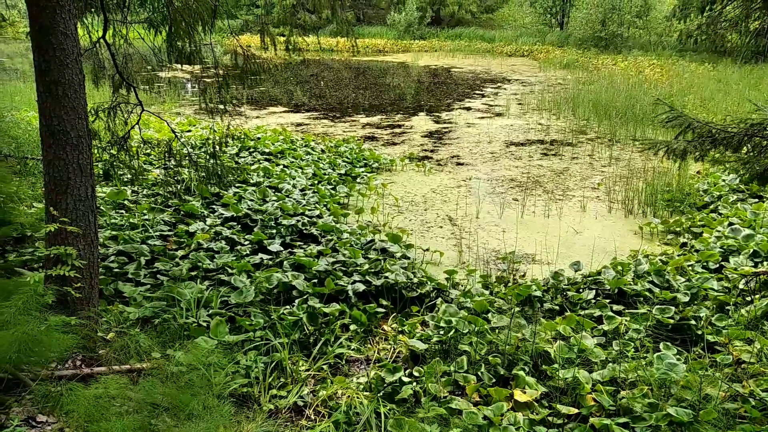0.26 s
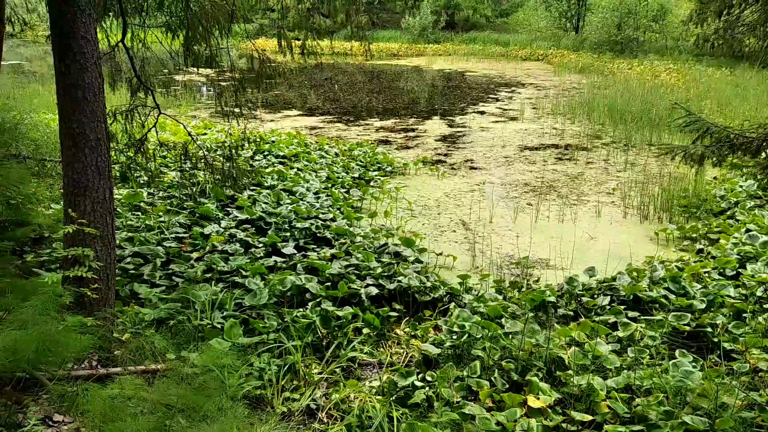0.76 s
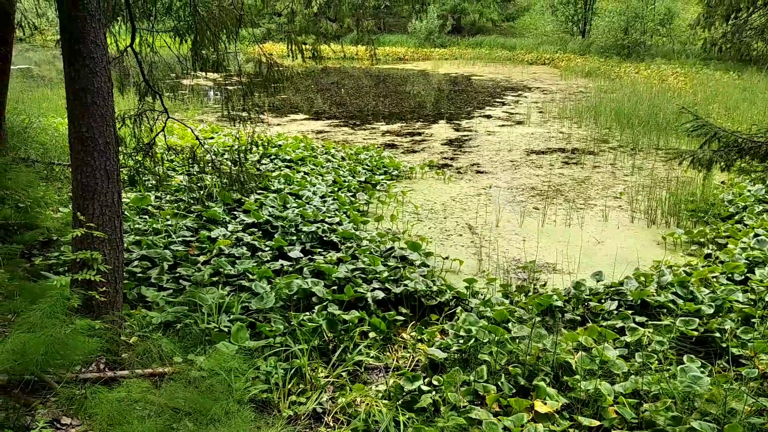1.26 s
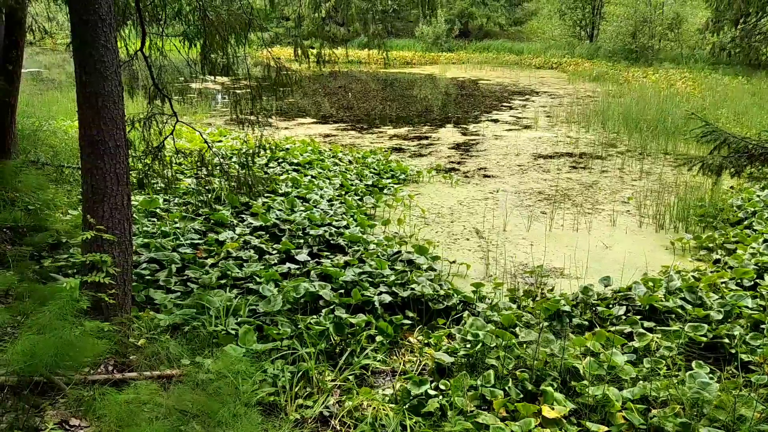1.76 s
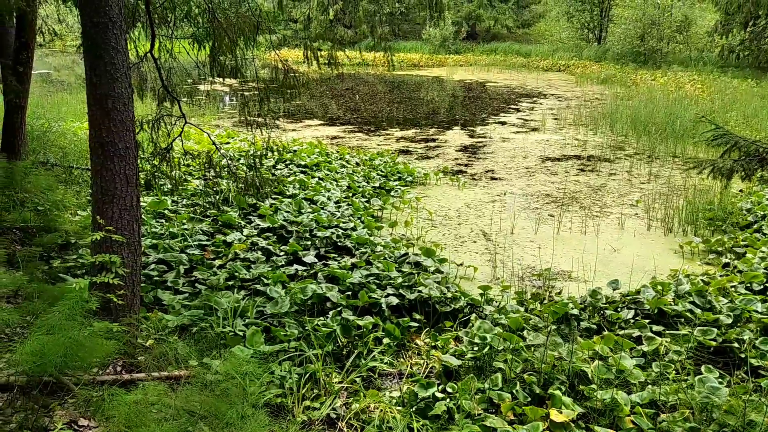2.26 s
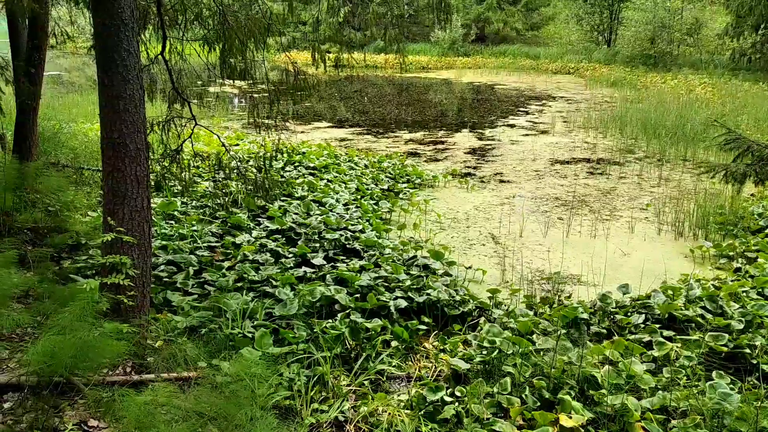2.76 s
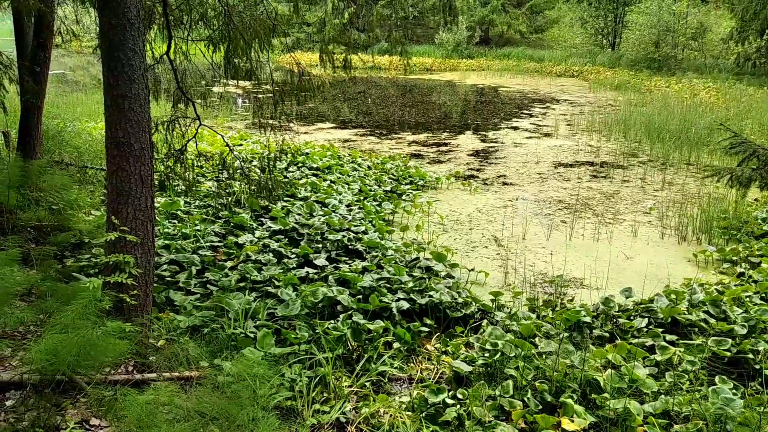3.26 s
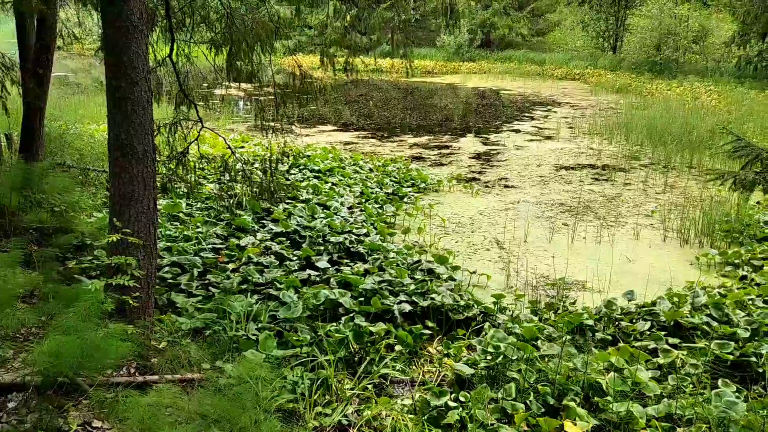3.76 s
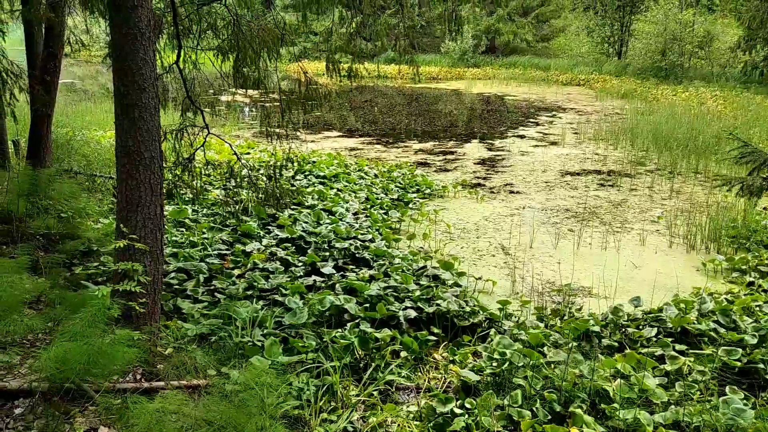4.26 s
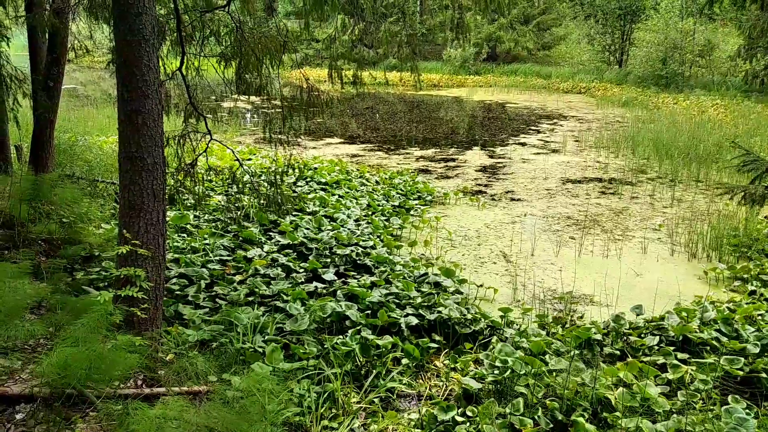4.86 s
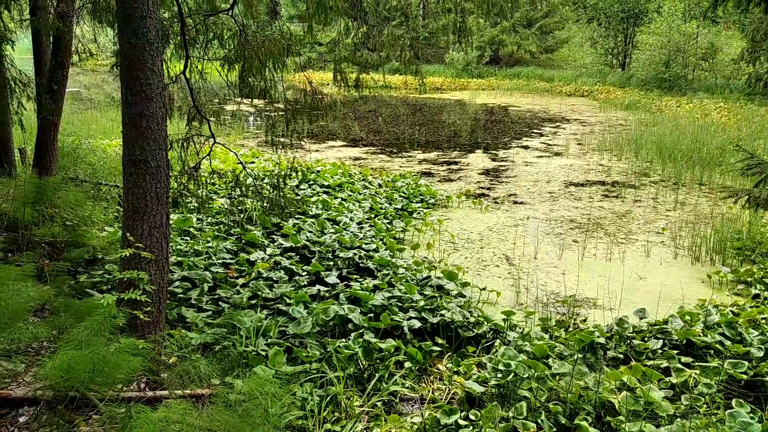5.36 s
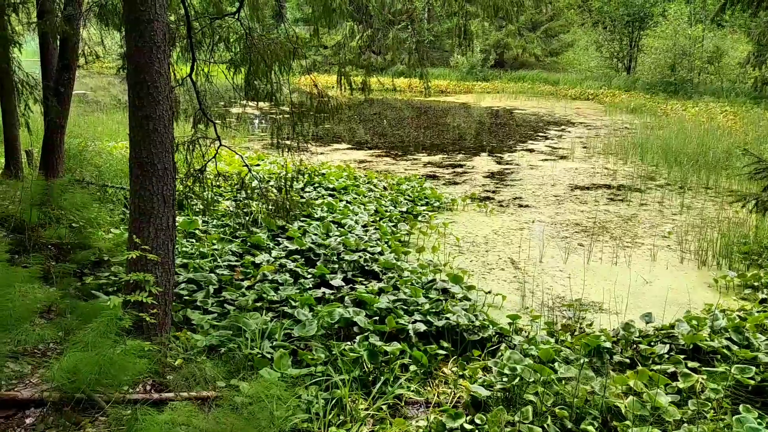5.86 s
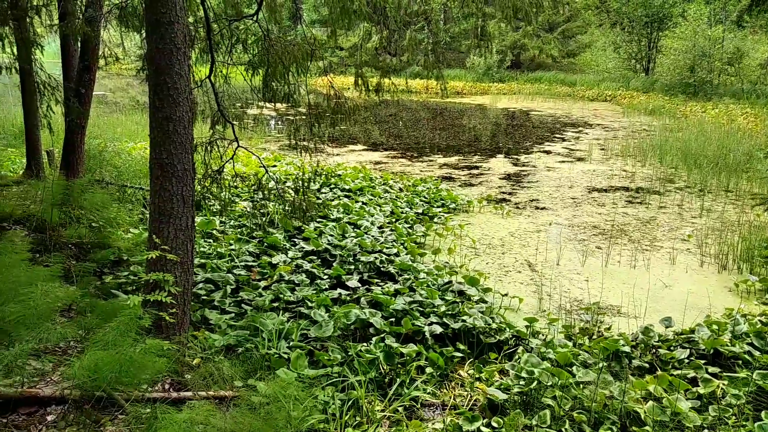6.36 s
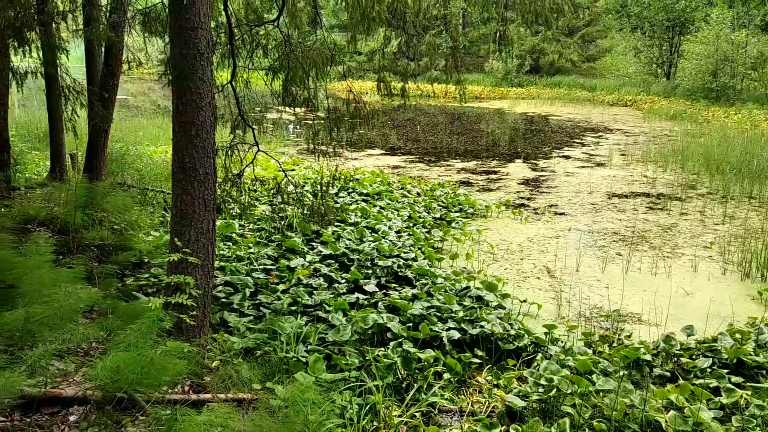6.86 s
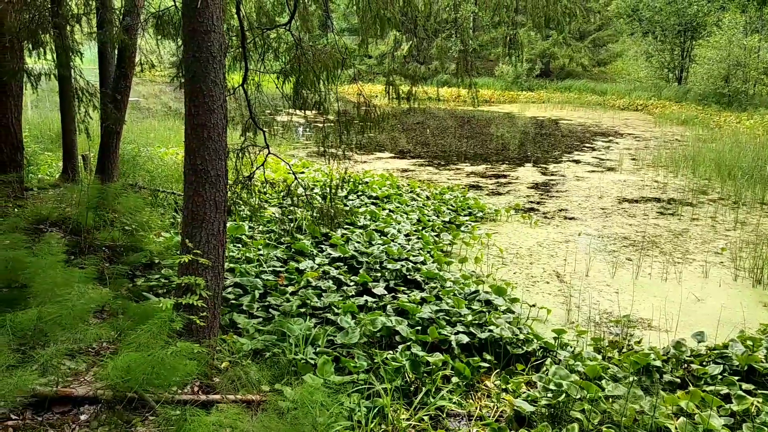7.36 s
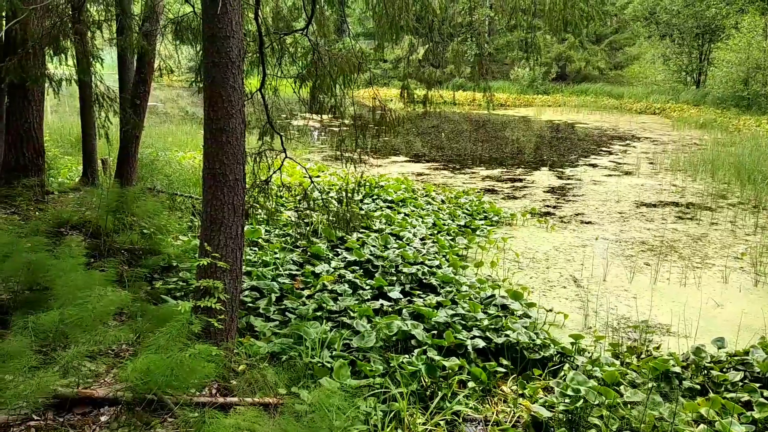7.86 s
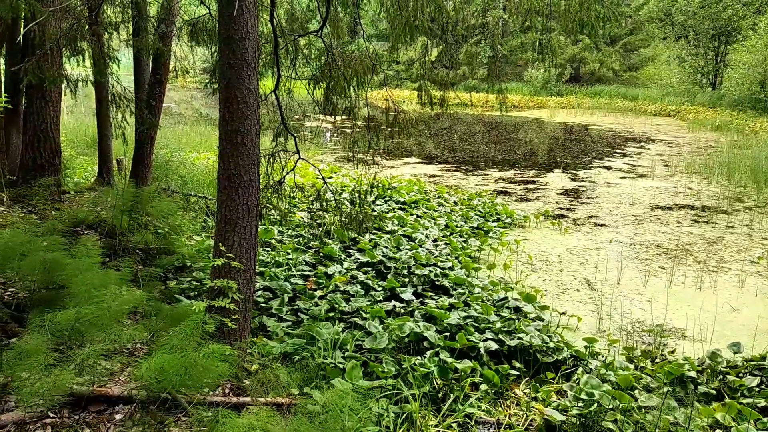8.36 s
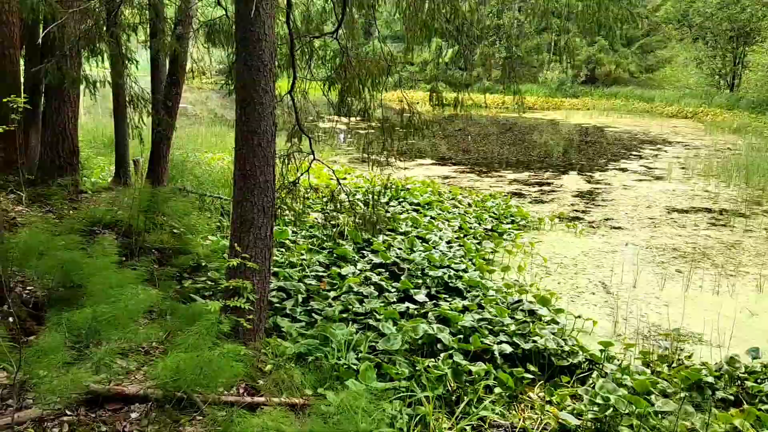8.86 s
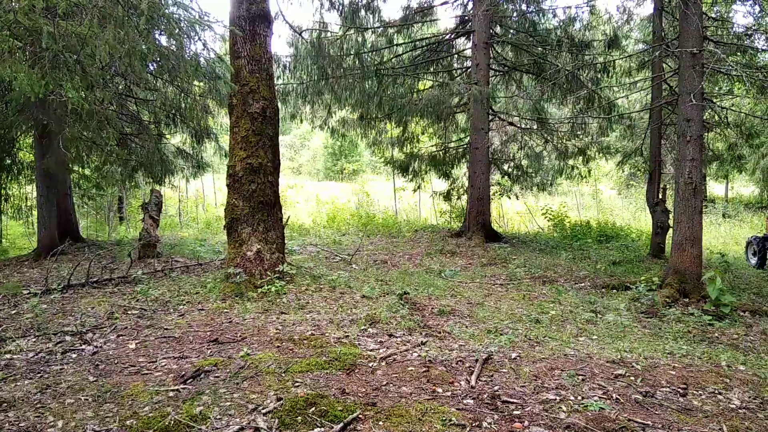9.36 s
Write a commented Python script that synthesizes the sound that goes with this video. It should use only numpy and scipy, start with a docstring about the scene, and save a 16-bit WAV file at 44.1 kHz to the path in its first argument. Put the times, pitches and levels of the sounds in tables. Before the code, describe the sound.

From 0 s a bush cricket's shrill, rapid buzz, about fifty strokes a second and brightest near 8 kHz, swells and stops at 2.7 s; a second, rougher singer carries on to 3.3 s. A hissing far chorus and very faint leaf noise sit behind. A light tap on the right comes at 0.15 s. Low wind gusts flutter and thump mainly on the left, hardest at 0.4-1.8 and 2.9-3.4 s. The strongest song grows from 3.6 s and ends at 6.6 s, overlapped by weaker ones until 7.4 and 8.4 s. The chorus thins around 6.5 s; four tiny notes near 2.1 kHz sound at 7.0-7.25 s. Another buzz swells from 7.5 s, wind now lighter. A faint tap at 9.0 s precedes near silence at 9.08-9.15 s; insects fade back in, with a slow deep bump at 9.4 s, continuing until the end at 9.6 s.

```python
"""Bush crickets sing beside a woodland pond, each song a fast buzz that swells and then stops.
Each singer rubs its wings about fifty times a second: clicks over a scrape, coloured by the wing, echoed by trees.
A far chorus and leaf hiss, made of patchy filtered noise, lie behind, with soft noise puffs and a short faint call
of four notes near 2.1 kHz at 7 s; gusts buffet the two microphone ports. Fingers tap the housing twice.
Near the end the sound drops out briefly, fades back in and gets a slow bump."""
import sys
import numpy as np
from scipy import signal
from scipy.fft import rfft, irfft, next_fast_len
from scipy.io import wavfile
from scipy.ndimage import uniform_filter1d, map_coordinates

SR = 44100
rng = np.random.default_rng(int(sys.argv[2]) if len(sys.argv) > 2 else 0)


def materialize(psi):
    """Save the field psi as 16-bit PCM at rate SR to the path in sys.argv[1].

    A 1-D psi becomes a single channel; in a 2-D psi each row is a channel.
    """
    bounded = np.clip(np.atleast_2d(psi).T, -1, 1)
    quanta = np.round(bounded * 32767).astype(np.int16)
    wavfile.write(sys.argv[1], SR, quanta)


N = 424241
TIME = np.arange(N) / SR  # seconds
# All source levels are set ahead of the fader in record().


def amp(db):
    """Decibels to linear gain."""
    return 10 ** (np.asarray(db) / 20)


def unit(x):
    """Scale to an RMS of one over all channels."""
    return x / np.sqrt(np.mean(x ** 2) + 1e-20)


def along(points, hz):
    """Read each column of (frequency [Hz], value, ..) points on a log frequency axis."""
    f, *cols = np.transpose(points)
    return np.array([np.interp(np.log(hz + 1), np.log(f + 1), c) for c in cols])


def curves(rows):
    """One value per sample for each column after the time."""
    s, *cols = np.transpose(rows)
    return [np.interp(TIME, s, c) for c in cols]


def wobble(rate):
    """A smooth random curve, rate knots a second."""
    knots = rng.standard_normal(int(N * rate / SR) + 4)
    return map_coordinates(knots, [TIME * rate])


def filtered(x, response):
    """Shape the spectrum of x by a (possibly complex) response of frequency."""
    m = next_fast_len(x.shape[-1] + 8192)
    spectrum = rfft(x, m) * response(np.fft.rfftfreq(m, 1 / SR))
    return irfft(spectrum, m)[..., :x.shape[-1]]


def patchy(depth_db):
    """Stereo noise whose gain varies in patches a few hundred hertz wide and some tens of milliseconds long."""
    z = signal.stft(rng.standard_normal((2, N)), nperseg=512)[2]
    field = uniform_filter1d(rng.standard_normal(z.shape), size=4, axis=1)  # across frequency
    field = uniform_filter1d(field, size=8, axis=2)  # across time
    return signal.istft(z * amp(depth_db * unit(field)), nperseg=512)[1][:, :N]


def leaves():
    """Faint broad leaf hiss, partly alike at both ports in the low middle."""
    # hiss colour: (frequency [Hz], relative level [dB per Hz])
    hiss_colour = [(40, -22), (150, 0), (400, -3.5), (900, -6), (1400, -8), (2050, -6.5), (3200, -13),
                   (5500, -12.5), (9000, -20), (14400, -17.5)]
    # left-right likeness of the hiss: (frequency [Hz], correlation [-1 to 1])
    likeness = [(100, -0.21), (300, 0.55), (650, 0.25), (1400, -0.15), (8000, -0.11)]
    # hiss loudness: (time [s], level [dB])
    hiss_level = [(0, -72.5), (1, -72.5), (4, -73), (9.1, -73.5), (9.14, -67.5), (9.62, -67)]

    def mid_side(hz):
        turn = np.arccos(np.clip(along(likeness, hz)[0], -1, 1)) / 2
        return amp(along(hiss_colour, hz)) * [np.cos(turn), np.sin(turn)]

    mid, side = filtered(patchy(depth_db=2), mid_side)
    sway_db = 0.5 * wobble(8.6)
    return amp(curves(hiss_level)[0] + sway_db) * unit(np.array([mid + side, mid - side]))


def puffs_and_call():
    """Soft puffs, and a short faint call of four notes near 2.1 kHz at 7 s, all of band-limited noise."""
    # puffs and notes: (time [s], left level [dB], centre [Hz], length [s], width [log-frequency],
    #  right over left [dB])
    puffs = [(3.94, -66, 219, 0.037, 0.53, -16), (4.033, -60.5, 177, 0.022, 0.47, -17),
             (4.399, -65.5, 193, 0.072, 0.36, -14), (0.13, -82, 2300, .006, .3, 6),
             (0.297, -79, 1790, 0.022, 0.56, -4), (7.038, -76, 2150, 0.011, .18, 2.5),
             (7.092, -75, 2090, 0.005, .15, 5.5), (7.165, -82, 2100, .025, 0.22, 7),
             (7.24, -83, 2000, .02, 0.18, 5)]
    out = np.zeros((2, N))
    t = np.arange(-SR // 8, SR // 8) / SR
    for s, db, centre, length, width, right_db in puffs:
        noise = rng.standard_normal((2, len(t)))
        puff = unit(filtered(noise, lambda hz: np.exp(-(np.log((hz + 1) / centre) / width) ** 2)))
        envelope = np.exp(-.5 * (t / length) ** 2)
        out[:, round(s * SR + t[0] * SR):][:, :len(t)] += amp([[db], [db + right_db]]) * puff * envelope
    return out


def chorus_band(levels, spectrum, throb_db, patchy_db):
    """Many far singers blur into a band of hiss that still throbs a little."""
    band = filtered(patchy(patchy_db), lambda hz: amp(along(spectrum, hz)))
    port_throb = throb_db * np.array([wobble(100), wobble(100)])
    shared_throb = 0.35 * wobble(16)
    return amp(curves(levels)[0]) * amp(port_throb + shared_throb) * band / np.std(band[0])


def far_chorus():
    """The main far band, a thin high hiss above it and a weak low edge of the chorus, 5.7 to 7.2 kHz."""
    # loudness of each band: (time [s], level [dB])
    main_level = [(0, -51.5), (1.5, -54.5), (3, -54.5), (3.3, -53.5), (3.6, -52.5), (4, -50), (5, -53),
                  (6.5, -71), (7.5, -63), (8.5, -52.5), (9.08, -54), (9.15, -44), (9.62, -48.5)]
    high_level = [(0, -66), (1.5, -68.5), (2.6, -67.5), (2.7, -79), (3.5, -80), (3.6, -68), (4, -67.5),
                  (4.5, -75), (6.5, -72.5), (6.7, -82.5), (7.6, -75.5), (8.3, -73), (9.62, -67.5)]
    low_edge_level = [(0, -73.5), (1.5, -70.5), (2.7, -73), (3.3, -74), (3.9, -72), (4.5, -73),
                      (5.5, -73.5), (6.3, -71), (6.7, -79.5), (8, -75), (8.4, -74), (9.1, -71), (9.62, -65)]
    # colour of each band: (frequency [Hz], relative left level [dB per Hz], relative right level [dB per Hz])
    main_colour = [(5430, -81, -78), (6570, -37.5, -30.5), (7166, -16, -12.5), (7830, -0.5, -5),
                   (8910, -2.5, -18), (9850, -9.5, -14.5), (11340, -21.5, -24), (11760, -26, -35.5),
                   (13200, -40.5, -51)]
    high_colour = [(10000, -32, -45), (11600, 1, -3.5), (12300, -7, -11), (13000, -2, -10),
                   (14400, -4, -11)]
    low_edge_colour = [(5150, -42, -42), (5680, -12.5, -14), (6150, -5.5, -6), (6550, 0, -3),
                       (7170, 4, 0.5), (7660, -26, -27)]
    main = chorus_band(main_level, main_colour, throb_db=1.5, patchy_db=1.5)
    high = chorus_band(high_level, high_colour, throb_db=2.5, patchy_db=4.0)
    low_edge = chorus_band(low_edge_level, low_edge_colour, throb_db=1.6, patchy_db=4.0)
    return main + high + low_edge


def wind():
    """Eddies push on each port separately, in lumps; harder gusts reach higher; the hardest suck and spring back."""
    # gusts on one port: (start [s], length [s], level [dB], port [0 left, 1 right])
    gust_rows = [(0, 0.014, -49.5, 0), (0.253, 0.85, -52.5, 0), (1.236, 0.19, -50.5, 0),
                 (1.756, 0.02, -56.5, 0), (1.85, 0.089, -63, 0), (2.3, 0.19, -66.5, 0),
                 (2.707, 0.046, -54.5, 0), (2.854, 0.56, -51, 0), (3.58, 0.25, -54.5, 0),
                 (4.285, 0.26, -52.5, 0), (4.647, 0.25, -55, 0), (5.158, 0.46, -53, 0),
                 (5.753, 0.23, -62, 0), (6.103, 0.091, -61, 0), (6.42, .05, -63.5, 0),
                 (6.62, 0.082, -59.5, 0), (7.5, .15, -67.5, 0), (7.804, 0.2, -55.5, 0),
                 (8.0, 0.21, -60.5, 0), (8.35, 0.21, -62, 0), (8.6, .06, -65.5, 0), (8.996, 0.053, -62, 0),
                 (9.44, 0.08, -55.5, 0), (0.16, 0.33, -66.5, 1), (0.703, 0.14, -59.5, 1),
                 (1.215, 0.12, -57, 1), (1.72, .12, -63, 1), (1.92, 0.15, -65, 1), (2.66, .2, -64, 1),
                 (4.98, 0.1, -60.5, 1), (5.748, 0.28, -66.5, 1), (6.96, 0.14, -66, 1),
                 (7.353, 0.095, -59.5, 1), (9.42, 0.23, -66, 1)]
    # rumble colour: (frequency [Hz], relative level [dB per Hz])
    rumble_colour = [(8, -0.5), (25, 1.5), (45, -0.5), (80, -10), (120, -18), (180, -27), (300, -40.5),
                     (600, -96)]
    # hardest eddies, on the left port: (time [s], depth [dB], width [s])
    hard_eddies = [(0.429, -42.5, 0.0039), (0.472, -44, 0.0032), (0.585, -46, 0.0037),
                   (0.887, -48.5, 0.003), (1.284, -39, 0.0053), (1.438, -46.5, 0.0049),
                   (1.541, -46, 0.0043), (1.772, -44.5, 0.0052), (2.717, -49, 0.0042),
                   (2.905, -42.5, 0.004), (2.929, -40, 0.003), (2.94, -45, 0.0034), (3.007, -41, 0.0036),
                   (3.026, -41, 0.0032), (3.142, -50, 0.0019), (3.155, -40.5, 0.0037),
                   (3.26, -43.5, 0.0024), (3.354, -41, 0.0031), (4.378, -42.5, 0.0033),
                   (5.391, -42.5, 0.004)]
    rise_db_s, fall_db_s = 201, 134
    calm_db = np.where(TIME < 9.12, -70.5, -77)  # between gusts, before and after the dropout
    db = calm_db + np.zeros((2, 1))
    for s, length, gust_db, port in gust_rows:
        before = np.maximum(s - TIME, 0)
        after = np.maximum(TIME - s - length, 0)
        shape_db = gust_db - rise_db_s * before - fall_db_s * after
        db[round(port)] = np.maximum(db[round(port)], shape_db)

    rumble = unit(filtered(rng.standard_normal((2, N)), lambda hz: amp(along(rumble_colour, hz))))
    flutter = unit(filtered(rng.standard_normal((2, N)),
                            lambda hz: np.exp(-(np.log((hz + 1) / 80) / 0.45) ** 2)))
    lumps = amp(3.6 * np.array([wobble(17), wobble(17)]))
    flutter_db = 1.474 * db + 14  # faster flutter swings wider than the gust
    gusts = unit(lumps * rumble) * amp(db) + unit(lumps ** 2 * flutter) * amp(flutter_db)

    t = np.arange(-SR // 20, SR // 20) / SR
    snap_db, snap_share = -18.5, 0.48  # sharper core of an eddy: relative level, share of its width
    for s, depth_db, width in hard_eddies:
        u = t / width
        core = u / snap_share
        suck = (1 - u ** 2) * np.exp(-.5 * u ** 2)
        snap = amp(snap_db) * (1 - core ** 2) * np.exp(-.5 * core ** 2)
        gusts[0, round(s * SR) - SR // 20:][:len(t)] -= amp(depth_db) * (suck + snap)
    return gusts


def ticks():
    """Short finger taps ring the damped modes of the housing; a brighter tap tilts toward the upper modes."""
    # taps: (time [s], left level [dB], right level [dB], lift at the top mode [dB])
    taps = [(0.1463, -75, -47, 0), (9.0068, -80, -61, 9)]
    # housing modes: (frequency [Hz], relative level [dB], 60 dB decay [s])
    modes = [(300, -6, .024), (450, -1, .014), (900, -4, .008), (1400, -3, .007), (1900, -3, .007),
             (2300, -7, .006)]
    out, t = np.zeros((2, N)), np.arange(SR // 20) / SR
    low, top = modes[0][0], modes[-1][0]
    soft_onset = 1 - np.exp(-t / .0008)  # a fingertip is soft
    for s, left_db, right_db, bright_db in taps:
        ring = np.zeros(len(t))
        for hz, db, t60 in modes:
            tilt_db = bright_db * (hz - low) / (top - low)
            ring += amp(db + tilt_db - 60 * t / t60) * np.sin(2 * np.pi * hz * t)
        out[:, round(s * SR):round(s * SR) + len(t)] += amp([[left_db], [right_db]]) * ring * soft_onset
    return out


def bump():
    """A slow push on the body: pressure rises, leaks away and sets the housing shaking at 43 Hz."""
    # the push: (time [s], left level [dB], right level [dB])
    push_row = (9.412, -24, -26.3)
    s, *db = push_row
    t = np.maximum(TIME - s, 0)
    push = (1 - np.exp(-t / .03)) * np.exp(-t / .09)
    shake = 0.018 * np.sin(2 * np.pi * 43 * t) * (1 - np.exp(-t / 0.044))
    return amp(db)[:, None] * (push + shake)


def song(effort, rhythm, wing, t60=0.37):
    """Wing strokes click and scrape as a song swells, tires and stops; weak ones sound flat; trees scatter it."""
    # clicks within a stroke: (place [share of the cycle], relative level [dB])
    wing_teeth = [(-.27, -15), (-.13, -12), (-.02, -3.5), (.1, -5), (.22, -15)]
    begin, stop, full_db, below_db, swell, echo_db, lag, right_db, scrape_db = effort
    rate, sag, tire, tiring, phase = rhythm
    start = round(begin * SR)
    t = TIME[start:round((stop + .3) * SR)]  # leaves room for the echo

    # stroke count and loudness
    left = stop - t
    tired = np.maximum(tiring - left, 0)
    cycle = phase - rate * left - (sag * left ** 2 + tire * tired ** 2) / 2
    under_db = below_db * np.exp(-(np.abs(t - begin) / swell) ** 1.4)
    level = full_db - under_db - 0.5 * tire * tired  # 0.5 dB for each stroke a second lost to tiring
    waver, slip = (wobble(10)[start:start + len(t)] for _ in range(2))
    effort_gain = amp(level + .4 * waver) * (left > 0)

    # mix of full-pitch and flat strokes: weak ones, and now and then a slip, go flat
    strong = np.clip(1.5 - under_db / 5, 0, 1) * np.clip(1 - .025 * slip ** 2, 0, 1)
    flat_share = .024  # how far flat

    def normal_wing(hz):
        return along(wing, hz)

    def flat_wing(hz):
        return along(wing, hz * (1 + flat_share))

    # clicks, scattered in time [share of a stroke] and size [dB]
    share, size_db = np.transpose(wing_teeth)
    whole = np.arange(np.ceil(cycle[0]), np.floor(cycle[-1]))[:, None]
    chance = rng.standard_normal((len(whole), 2, len(share)))
    stroke_jitter = .018 * rng.standard_normal(whole.shape)
    places = whole + share + .016 * chance[:, 0] + stroke_jitter
    at = np.searchsorted(cycle, places).clip(0, len(t) - 1)
    sizes = amp(size_db + .4 * chance[:, 1])
    clicks = np.bincount(at.ravel(), sizes.ravel(), len(t))

    def click_ring(hz):
        # a click already carries 0.8 of the wing colour in dB, so it rings mostly the main resonance
        return amp(.8 * np.array([normal_wing(hz)[0], flat_wing(hz)[0]]))

    clicks = filtered(unit(clicks) * np.sqrt([strong, 1 - strong]), click_ring).sum(axis=0)

    # the scrape swells once a stroke
    stroke_place = (cycle + .5) % 1 - .5
    closing = unit(np.exp(-.5 * (stroke_place / .15) ** 2))
    scrape = amp(scrape_db) * closing * rng.standard_normal(len(t))
    rub = (clicks + scrape) * effort_gain / np.hypot(1, amp(scrape_db))

    # the power of the tree echo trails the strokes
    decay = amp(-120 * np.arange(SR // 5) / SR / t60)  # power falls 60 dB in t60
    echo_power = signal.fftconvolve((closing * effort_gain) ** 2, decay / decay.sum())[:len(t)]
    echo = amp(echo_db) * np.sqrt(np.abs(echo_power)) * rng.standard_normal((2, len(t)))
    direct = filtered(rub, lambda hz: np.exp(-2j * np.pi * hz * np.array([[0], [lag]])))
    drive = (direct + echo) / np.hypot(1, amp(echo_db))

    # the wing colours it all
    loud = filtered(drive * np.sqrt(strong), lambda hz: amp(normal_wing(hz)))
    soft = filtered(drive * np.sqrt(1 - strong), lambda hz: amp(flat_wing(hz)))
    wing_rms = np.sqrt(np.mean(amp(normal_wing(np.linspace(0, SR / 2, 2000))[0]) ** 2))
    out = np.zeros((2, N))
    out[:, start:start + len(t)] = amp([[0], [right_db]]) * (loud + soft) / wing_rms
    return out


def near_singers():
    """Seven songs, each through the resonances of a singer's wings as the two ports hear them."""
    # a song is a pair of rows, effort and rhythm:
    # (start [s], stop [s], full level [dB], start below it [dB], swell [s], echo over direct drive [dB],
    #  right port after left [s], right port gain [dB], scrape over clicks before they ring [dB]),
    # (steady rate at the stop [strokes/s], rate lost [strokes/s per s], tiring loss [strokes/s per s],
    #  tiring [s], stroke phase [cycles])
    song_rows = [((0, 2.655, -45.9, 13.5, .45, -2.5, .000394, 0.1, -8), (50.517, 1.211, 26.06, .285, .573)),
                 ((3.6, 6.555, -40.6, 22, .5, -8, .000394, 1.5, -12), (50.713, .893, 20.95, .243, .139)),
                 ((7.5, 9.09, -44.8, 21, .6, -4, .000394, -1.2, -12), (51.889, 1.159, 0, 0, .938)),
                 ((9.25, 9.62, -44, 24, .2, -4.5, .0002, 0.1, -10.5), (52.195, 0, 0, 0, .55)),
                 ((.2, 3.33, -46.8, 18, 1.2, -.6, -.0002, 0.1, 5), (53.799, -.592, 13.07, .807, .492)),
                 ((5.3, 8.4, -51.3, 17, .8, 1, -.0002, -1.2, 5), (49.808, 1.973, 16.7, .516, .491)),
                 ((4.6, 7.4, -62, 14, .5, -4.5, -.0001, 0.1, 1.5), (51.809, -.702, 15.84, .53, .722))]
    # wing colours: (frequency [Hz], relative left level [dB per Hz], relative right level [dB per Hz])
    first_wing = [(5600, -70, -70), (6400, -42, -45), (7000, -36, -36), (7500, -32, -30), (7950, -9, -11),
                  (8200, .5, -8), (8400, -1, -11.5), (8800, -6.5, -15), (9200, -10, -18.5),
                  (9600, -12, -12.5), (9950, -15, -14), (10200, -14, -19), (10560, -24, -22),
                  (11500, -21, -30), (12300, -44, -46), (13000, -65, -65)]
    nearest_wing = [(5600, -80, -80), (6460, -53, -50), (6960, -31, -27), (7650, -28, -31),
                    (7850, -11, -19), (8030, -7, -14), (8180, 1, -8), (8350, -5, -14), (8490, 1, -12.5),
                    (8780, -6, -19), (8910, -13, -21), (9060, -6, -18), (9280, -15, -18), (9430, -13, -17),
                    (9600, -16, -16.5), (10200, -22.5, -23), (11100, -27.5, -33), (11900, -42, -47),
                    (12900, -74, -72)]
    low_wing = [(5470, -84, -84), (6360, -42, -40), (6820, -27, -28), (7300, -13, -10), (7520, -7, -2.5),
                (7750, -.5, -3), (8070, 1, -8.5), (8500, 0, -13), (9000, -3, -13), (9300, -5, -12),
                (9700, -10, -11.5), (10140, -16, -18), (10500, -27, -22), (12000, -67, -45)]
    second_low_wing = [(5500, -77, -75), (6300, -33, -29), (6970, -27, -20), (7330, -12.5, -5),
                       (7500, -3, -3), (7700, -6, -4), (7930, 1, -3), (8500, -7.5, -11), (8900, -3, -11),
                       (9300, -13, -15), (9660, -5, -12), (10030, -15, -15), (10500, -28, -20.5),
                       (11900, -47, -47)]
    thin_wing = [(6960, -53, -60), (7700, -19, -17), (8440, 3, -4), (9250, -5, 2), (10200, -3, -4.5),
                 (11170, -18, -6), (12100, -60, -30)]
    wings = [first_wing, nearest_wing, nearest_wing, nearest_wing, low_wing, second_low_wing, thin_wing]
    return sum(song(effort, rhythm, wing) for (effort, rhythm), wing in zip(song_rows, wings))


def scene():
    """The pond's background, the wind and handling, and the near singers together."""
    background = leaves() + puffs_and_call() + far_chorus()
    handling = ticks() + bump()
    return background + wind() + handling + near_singers()


def record(dry):
    """A brief dropout with a fade-in, then a band limit at 14400 Hz."""
    # fader: (time [s], gain [dB])
    fader_moves = [(9.078, 2), (9.086, -40), (9.145, -57), (9.155, -13), (9.22, -9), (9.3, -4.5),
                   (9.45, -2)]
    return filtered(dry * amp(curves(fader_moves)[0]), lambda hz: hz < 14400)


dry = scene()
out = record(dry)
materialize(out)
```